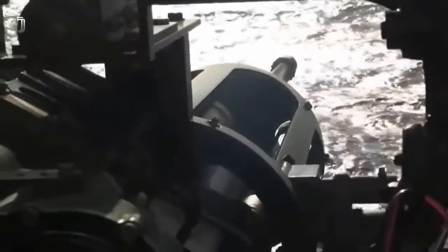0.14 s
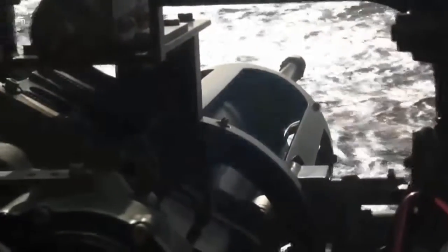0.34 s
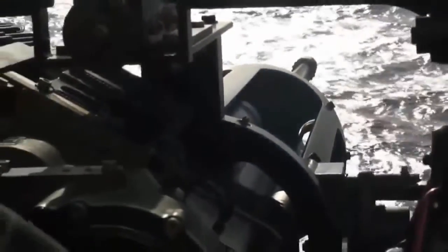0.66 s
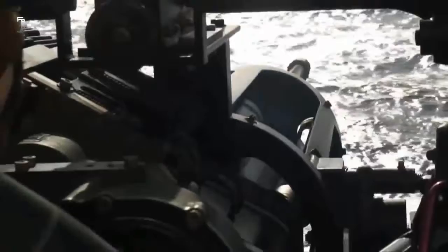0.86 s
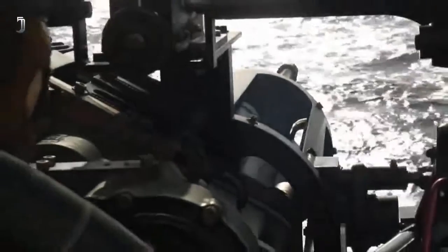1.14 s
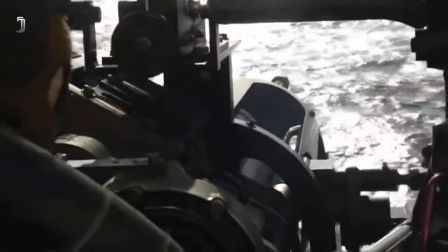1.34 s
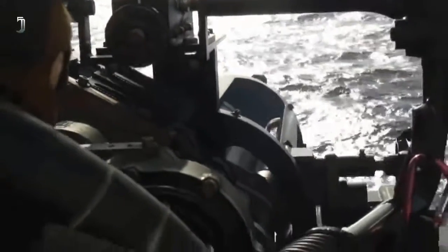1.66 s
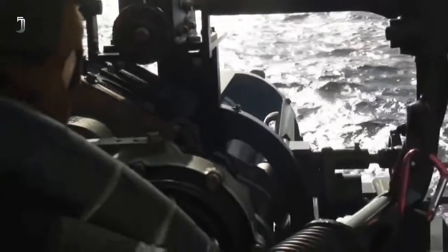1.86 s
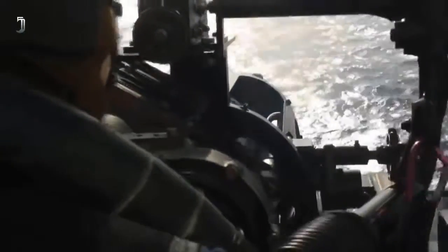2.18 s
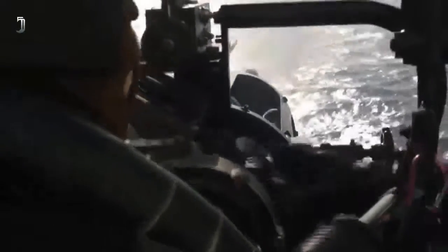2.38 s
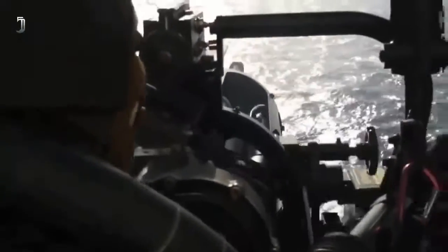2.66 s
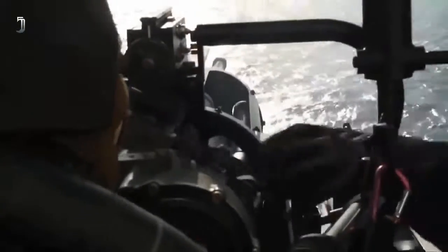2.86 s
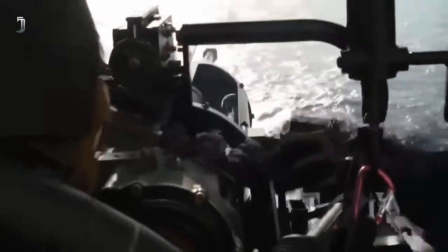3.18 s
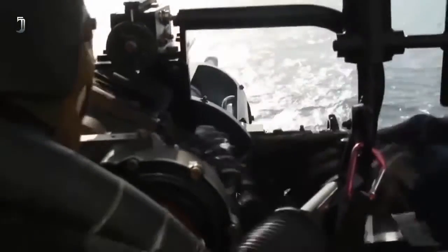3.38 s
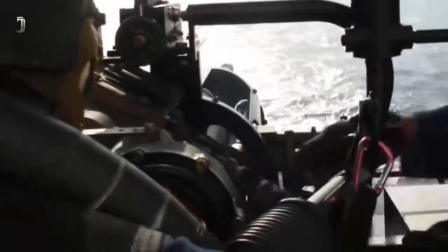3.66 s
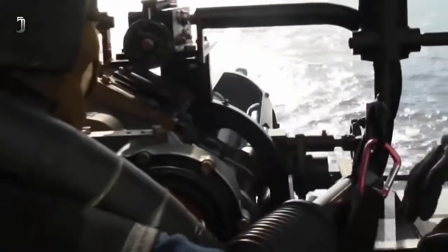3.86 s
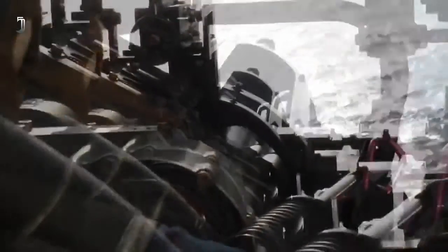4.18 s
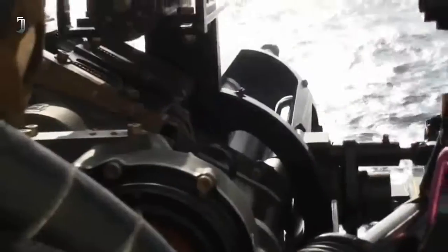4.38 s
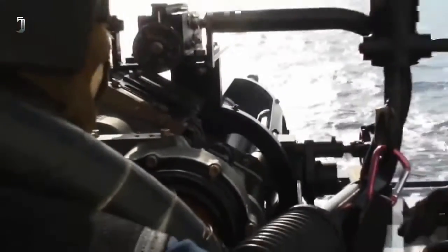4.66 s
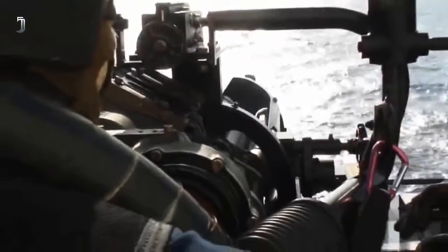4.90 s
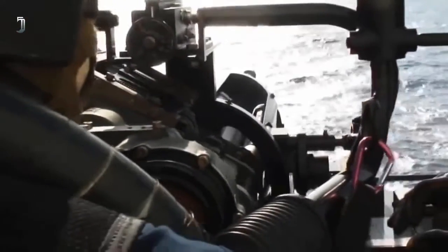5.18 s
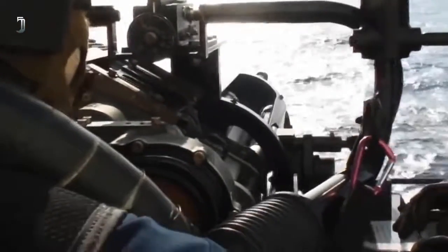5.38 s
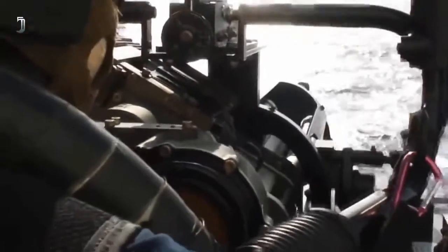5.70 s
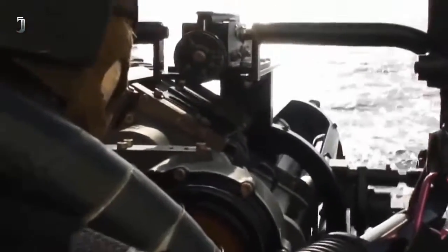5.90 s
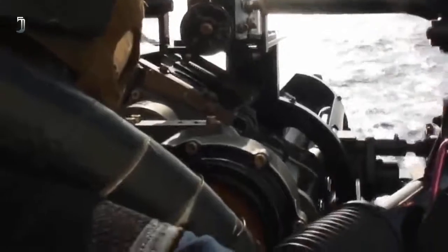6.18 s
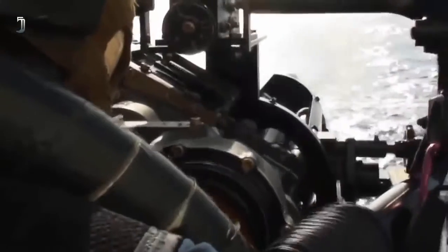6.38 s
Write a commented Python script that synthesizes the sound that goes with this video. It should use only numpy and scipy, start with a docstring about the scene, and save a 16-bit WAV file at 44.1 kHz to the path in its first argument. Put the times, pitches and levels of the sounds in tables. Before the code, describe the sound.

The sound is close, from just behind a mounted automatic cannon on a boat at sea. A quiet machinery hum, hull rumble and water wash run underneath. In the first second, loose steel fittings clink and knock, then jiggle faintly. At 1.8 seconds the feed chain starts grinding, with a hard clank and a high ping of belt links. From 2.0 to 3.3 seconds the cannon fires five loud, even rounds, 0.3 seconds apart. Each is a bright crack, then a roar and boom, with the bolt clanking in time, ringing the shield and slightly overloading the microphone. Until about 4.5 seconds the echo fades over the water while the chain runs down and a faint motor whine sinks. Between 4.4 and 5.4 seconds come light latch clacks and dull knocks. At 6.1 seconds the chain starts again, and firing resumes near 6.35, cut off by the end.

```python
"""A chain-driven cannon on a boat's deck spins up, fires five rounds, and later starts a second burst.
Each round is a bright crack, then a roar and a late boom of expanding gas that ring the gun shield,
scatter back off the sea and overload the microphone. The feed chain grinds, the bolt clanks in time,
and the motor whines down after the first burst. In the pauses loose steel clinks and knocks on the
mount, over a bed of machinery hum, hull rumble and water."""
import sys
import numpy as np
from scipy import signal
from scipy.fft import rfft, irfft, next_fast_len
from scipy.io import wavfile
from scipy.ndimage import uniform_filter1d, map_coordinates

SR = 44100
rng = np.random.default_rng(int(sys.argv[2]) if len(sys.argv) > 2 else 0)


def transcribe(u):
    """Save the signal u as a 16-bit wav file named by the first command-line argument.

    u: samples, shape (n,) or (channels, n), limited to [-1, 1]; the rate is SR.
    q: integer samples, one column per channel.
    """
    v = np.clip(np.atleast_2d(u).T, -1, 1)
    q = np.round(v * 32767).astype(np.int16)
    wavfile.write(sys.argv[1], SR, q)


N = 288414

# bursts of fire: trigger pull t/s, trigger release t/s, feed rattle level/dB
BURSTS = [(1.834, 3.359, -28), (6.145, 6.8, -25.5)]
# modes of the gun's steel receiver: f/Hz, level/dB, t60/s
RECEIVER = [(1410, -6.5, 0.11), (1710, -5, 0.15), (2017, -2.5, .14), (2930, 0.5, 0.087), (3413, -3.5, .12),
            (3720, -2, .14), (4033, -1.5, 0.068), (4820, -4, 0.16), (5420, -5.5, .12), (6040, -2.5, .18),
            (6274, -7.5, .15), (6900, -7.5, .2), (8200, -2.5, 0.1), (8730, -13, .18), (9100, -12, .12),
            (9940, -12, .15), (10800, -12, .08)]


def amp(db):
    """Decibels to gain."""
    return 10 ** (np.asarray(db) / 20)


def unit(x):
    """Scale to rms 1."""
    return x / np.sqrt(np.mean(x ** 2) + 1e-20)


def along(points, hz):
    """Read (f/Hz, value) breakpoints on a log frequency axis."""
    f, value = np.transpose(points)
    return np.interp(np.log(hz + 1), np.log(f), value)


def wobble(rate, size=N):
    """A smooth random curve, rate knots a second."""
    knots = rng.standard_normal(int(size * rate / SR) + 4)
    return map_coordinates(knots, [np.arange(size) * rate / SR])


def filtered(x, response):
    """Equalise x with a gain given as a function of frequency."""
    size = next_fast_len(len(x) + SR // 4)
    return irfft(rfft(x, size) * response(np.fft.rfftfreq(size, 1 / SR)), size)[:len(x)]


def noise(spectrum, size=N):
    """Coloured noise of rms 1 from (f/Hz, level/dB) breakpoints."""
    return unit(filtered(rng.standard_normal(size), lambda hz: amp(along(spectrum, hz))))


def envelope(t, peak_db, attack_s, sag_db_per_s, hold_s, release_db_per_s):
    """Gain that rises, sags until hold_s and then dies away faster."""
    fall_db = sag_db_per_s * np.maximum(t - attack_s, 0) + release_db_per_s * np.maximum(t - hold_s, 0)
    return np.clip(t / attack_s, 0, 1) * amp(peak_db - fall_db)


def add(track, s, sound):
    """Mix a sound into the track from time s."""
    part = track[max(round(s * SR), 0):][:len(sound)]
    part += sound[:len(part)]


def rounds(delay_s=0.21, period_s=0.2975):
    """Ignition times: the gun fires at a steady rate while the trigger is held."""
    return np.concatenate([np.arange(pull + delay_s, release, period_s) for pull, release, _ in BURSTS])


def blows(hits, modes, scrape_db, scrape_t60, scatter_db, split_hz, bite):
    """Steel meets steel: a chattering contact rings the modes at new strengths each time."""
    out, t = np.zeros(N), np.arange(SR // 4) / SR
    hz, mode_db, t60 = np.transpose(modes)[:, :, None]
    for s, db, contact_s, tilt in hits:
        level = mode_db + tilt * np.log2(hz / hz.mean())
        strength = amp(level + scatter_db * rng.standard_normal(hz.shape))
        # each mode is a close pair that beats
        beat = np.cos(2 * np.pi * split_hz * rng.uniform(0.918, 1, hz.shape) * t)
        partials = np.sin(2 * np.pi * (hz * t + rng.random(hz.shape)))
        ring = np.sum(strength * beat * amp(-60 * t / t60) * partials, 0) / np.linalg.norm(strength)
        colour = [(hz.min() / 4, -50), *np.c_[hz, level - level.max()], (hz.max() * 2, -60)]
        scrape = amp(scrape_db - 60 * t / scrape_t60) * noise(colour, len(t))
        body = (1 - np.exp(-t / 0.00039)) * ring + scrape
        # tiny slips and rebounds swell and fade within the contact
        slips = rng.standard_normal(len(t)) * (rng.random(len(t)) < 1400 / SR)
        contact = slips * np.sqrt(t / contact_s) * np.exp(-t / contact_s)
        contact[0] = bite  # the first touch
        hit = signal.fftconvolve(contact, body)[:len(t)]
        peak_rms = np.sqrt(uniform_filter1d(hit ** 2, size=300).max())
        add(out, s, amp(db) * hit / peak_rms)
    # the finite contact time takes off the highest treble
    return filtered(out, lambda f: 0.25 + 0.75 / (1 + (f / 11800) ** 30))


def boat():
    """Machinery hums through the deck, over the rumble of the hull and the wash of the water."""
    # hum partials, rumble spectrum and wash spectrum: f/Hz, level/dB
    hum_partials = [(107.7, -0.5), (220.7, -7.5), (263.8, -13.5), (312.2, -16), (468.3, -19)]
    rumble_spectrum = [(20, -4), (45, -5), (80, 2.5), (110, -6.5), (140, 1), (190, -3), (280, -6.5),
                       (400, -14.5), (900, -57)]
    wash_spectrum = [(150, -14), (350, -3.5), (700, -1), (1150, -4.5), (1550, -17), (2300, -27),
                     (4000, -34), (8000, -37.5), (11000, -46.5), (12500, -64), (15000, -72)]
    # fader rides, one before and one after the first burst: t/s, relative level/dB
    hum_rides = [
        [(0.25, -71), (0.356, -51.5), (0.926, -54.5), (1.8, -48.5)],
        [(4.3, -54), (4.34, -49.5), (5.288, -47.5), (6.12, -42)],
    ]
    wash_rides = [
        [(0.0, -44.5), (0.54, -53.5), (1.178, -56), (1.8, -51)],
        [(4.3, -53), (4.512, -56), (5.15, -55), (6.12, -50.5)],
    ]
    t = np.arange(N) / SR
    hum_db = np.interp(t, *np.vstack(hum_rides).T) + 4.5
    wash_db = np.interp(t, *np.vstack(wash_rides).T) + 0.47
    rumble_db = -48.5 + 5.5 * np.exp(-((t - 4.24) / 0.11) ** 2)  # one brief swell
    drifting_t = np.cumsum(1 + 0.0037 * wobble(5)) / SR
    hum = sum(amp(db + 1.5 * wobble(11)) * np.sin(2 * np.pi * hz * drifting_t) for hz, db in hum_partials)
    rumble = amp(rumble_db + 1.1 * wobble(11)) * noise(rumble_spectrum)
    wash = amp(wash_db + 0.73 * wobble(8)) * noise(wash_spectrum)
    return amp(hum_db) * hum + rumble + wash


def hanging_ring(contact_s=0.0053):
    """A hanging steel ring is jogged lightly, so little but its long tone is heard."""
    jogs = [(.26, -49), (.55, -54), (0.826, -61), (3.88, -62), (3.96, -60.5), (4.92, -51.5), (5.943, -60)]  # light nudges: t/s, level/dB
    modes = [(6278, 1.5, 0.37), (6300, -5.5, 0.15)]  # the ring's tone: f/Hz, level/dB, t60/s
    hits = [(s, db, contact_s, 0) for s, db in jogs]
    return blows(hits, modes, scrape_db=-16, scrape_t60=0.031, scatter_db=2.5, split_hz=8, bite=0.5)


def fittings(gap_s=0.07, contact_s=0.006, tilt_db=-3.5):
    """Loose steel fittings clink on the mount and jiggle in spells of faint, uneven touches."""
    clinks = [(.14, -39, 0.0066, -10.5), (.171, -35, 0.0064, -5.5), (.212, -42, 0.0023, 0),
              (.226, -41.5, 0.0044, -5), (.305, -38, .003, 0.5), (.32, -36, 0.009, -3),
              (.335, -32.5, 0.004, -3), (.521, -57.5, 0.0021, -5.5), (.553, -60, 0.011, -4),
              (.739, -40.5, .0022, -1), (.767, -40.5, .007, 5)]  # distinct hits: t/s, level/dB, contact/s, tilt/(dB per octave)
    spells = [(0.404, 1.0, -68.5), (1.612, 1.8, -60), (5.677, 5.96, -66)]  # jiggling: start t/s, end t/s, level/dB
    modes = [(2031.6, -6, 0.084), (2450, -9.5, 0.071), (2810, -11.5, .07), (3365, -6.5, 0.049),
             (3850, -15, 0.085), (4280, -12, 0.046), (5120, -12, 0.075), (6150, -1, 0.087),
             (6234, -5.5, 0.37), (6620, 0.5, .12), (7260, -2, .12), (7800, -12, .09), (8380, 3.5, 0.138),
             (8860, -11.5, .09), (9400, -5.5, 0.091), (11100, -2.5, 0.072), (10960, -8, 0.067),
             (11330, -9.5, .14), (12360, -17.5, .08)]  # the fittings' ring: f/Hz, level/dB, t60/s
    hits = list(clinks)
    for start, end, db in spells:
        for s in np.arange(start, end, gap_s):
            hits.append((s + rng.uniform(0, gap_s / 2), db + rng.uniform(-0.5, 0.5), contact_s, tilt_db))
    return blows(hits, modes, scrape_db=-7, scrape_t60=0.099, scatter_db=7, split_hz=12, bite=0.55)


def cradle():
    """Dull knocks ring the low modes of the gun cradle."""
    knocks = [(.038, -44, .005, 5), (.108, -30.5, 0.0037, -2.5), (.12, -34.5, .008, -2),
              (.14, -35, 0.0132, -3.5), (.333, -40.5, .007, 2), (4.497, -46, .003, 3.5),
              (4.514, -39, .0043, 1.5), (5.367, -44, 0.0025, -2.5)]  # hits on the cradle: t/s, level/dB, contact/s, tilt/(dB per octave)
    modes = [(192.4, -7.5, 0.25), (339, -9.5, 0.3), (541, -7.5, 0.4), (705, -3.5, 0.11), (932, -5.5, 0.05),
             (1090, -4, 0.063), (1248, -3, 0.11), (1677, -7.5, 0.078), (2076, -11, 0.075),
             (2516, -16.5, 0.06), (2880, -28, 0.06), (3700, -26, 0.092)]  # its ring: f/Hz, level/dB, t60/s
    return blows(knocks, modes, scrape_db=-5.5, scrape_t60=0.13, scatter_db=2, split_hz=2.5, bite=0.9)


def latch():
    """A latch on the gun is worked between the bursts, in short, bright clacks."""
    clacks = [(4.448, -49.5, 0.0134, -7.5), (4.495, -48.5, 0.015, -7.5), (4.76, -43, 0.0041, -3.5),
              (4.769, -35, 0.0027, -3), (4.902, -35.5, 0.0024, -1.5), (4.974, -36.5, 0.0061, 6),
              (5.081, -49, 0.0046, 6.5), (5.249, -57.5, .002, 2), (5.365, -58, .003, 0),
              (5.385, -48.5, 0.0067, 2), (5.743, -57.5, .004, -11)]  # latch hits: t/s, level/dB, contact/s, tilt/(dB per octave)
    modes = [(804, -3.5, 0.039), (1008, -6.5, 0.16), (1410, -5, 0.052), (1690, -11, .05),
             (2320, -7.5, 0.025), (2621, -3.5, 0.037), (3320, -2.5, 0.039), (3830, -7, 0.033),
             (3920, -4, 0.037), (4320, -3.5, 0.032), (5160, -6, .06), (6040, 1.5, 0.032), (6300, 0, 0.046),
             (6720, -1, 0.069), (7190, 3, .06), (7670, -5, 0.055), (8560, 3, 0.054), (8330, -1.5, 0.15),
             (8580, -2, 0.11), (9630, -10.5, 0.092), (10700, -3, 0.061), (11050, -1, 0.042)]  # its ring: f/Hz, level/dB, t60/s
    return blows(clacks, modes, scrape_db=-14, scrape_t60=0.11, scatter_db=3, split_hz=5.5, bite=0.207)


def belt_links():
    """Loose belt links are set ringing in high, clean pings."""
    pings = [(1.965, -33.5, .005, -7.5), (1.98, -23, .005, -0.5), (2.555, -33, .007, -6),
             (6.283, -28, .008, 11)]  # link hits: t/s, level/dB, contact/s, tilt/(dB per octave)
    modes = [(4843, 1.5, 0.23), (6160, -8, .15), (6400, -5, .25), (7050, -5, .14), (8500, -10, .14)]  # a link's ring: f/Hz, level/dB, t60/s
    return blows(pings, modes, scrape_db=-16.5, scrape_t60=0.03, scatter_db=0.5, split_hz=8.1, bite=0.4)


def coasting_motor(start_hz=2720, sink_hz_per_s=1180, blur_hz=257):
    """A rough gear whine sinks as the motor runs out after the first burst."""
    t = np.arange(N) / SR - BURSTS[0][1]  # time since the trigger's release
    phase = 2 * np.pi * np.cumsum(np.maximum(start_hz - sink_hz_per_s * t, 0)) / SR
    whine = unit(wobble(blur_hz) * np.sin(phase) + wobble(blur_hz) * np.cos(phase))
    return whine * envelope(t, -58.5, attack_s=0.92, sag_db_per_s=6.5, hold_s=0.92, release_db_per_s=45)


def feed_chain(spin_up_s=0.026, run_down_s=0.74, jolts_per_s=69, jolt_decay_s=0.0047, dull_hz=3801):
    """Chain links and cartridges grind through the feeder and jolt against it while the drive runs."""
    spectrum = [(120, -41.5), (200, -10.5), (479, -5.5), (1430, 3), (2470, -5), (2960, -4.5), (3240, -7),
                (6130, -8), (7480, -10.5), (10800, -19.5), (12200, -33.5), (14400, -26), (15500, -33.5)]  # the chain's grind: f/Hz, level/dB
    kicks = (rng.random(N) < jolts_per_s / SR) * rng.uniform(0.51, 1, N)
    jolts = signal.lfilter([1], [1, -np.exp(-1 / (jolt_decay_s * SR))], kicks)
    grind = (1 + amp(5) * jolts) * amp(0.5 * wobble(400)) * noise(spectrum)
    steel = lambda f: 1 + sum(0.58 * amp(db) / (1 + 1j * (f - hz) / 35) for hz, db, _ in RECEIVER)
    bright = unit(filtered(grind, steel))
    # the drive needs a moment to reach speed, and slow contacts sound dull
    dull = unit(filtered(bright, lambda f: 1 / (1 + (f / dull_hz) ** 2)))
    out, t = np.zeros(N), np.arange(N) / SR
    for pull, release, db in BURSTS:
        spin_up = 1 - np.exp(-np.maximum(t - pull, 0) / spin_up_s)
        run_down = np.clip(1 - (t - release) / run_down_s, 0, 1)
        blend = spin_up ** 5 * run_down ** 1.2
        out += amp(db) * spin_up * run_down ** 2.64 * ((1 - blend) * dull + blend * bright)
    return out


def bolt_and_belt():
    """The bolt's cycle rings the receiver on every round; so does the belt as it snatches or slackens."""
    # take up, draw, feed, ram, lock, fire: t/s from ignition, level/dB, contact/s, tilt/(dB per octave)
    cycle = [(-.198, -32, .005, -4), (-.177, -36, .007, 0.5), (-.13, -24, .012, 1), (-.096, -21, .008, 4),
             (-.029, -28, 0.014, -8.5), (.008, -19, .004, 2)]
    clanks = [(1.944, -15.5, 0.00334, 1.5), (3.55, -40, 0.005, 12), (3.648, -33, .0074, -3.5),
              (3.825, -42.5, .007, -5.5), (3.938, -55.5, 0.0074, -3), (4.136, -60, .004, -9),
              (4.231, -65, 0.0086, -8), (6.263, -19, 0.0077, -1)]  # the belt's hits: t/s, level/dB, contact/s, tilt/(dB per octave)
    hits = [(s + offset, *blow) for s in rounds() for offset, *blow in cycle] + clanks
    return blows(hits, RECEIVER, scrape_db=-2, scrape_t60=0.071, scatter_db=4.5, split_hz=17, bite=1.3)


def sea_echo(level_db=-24, build_s=0.088):
    """Each report scatters back from the waves; the treble dies first."""
    spectrum = [(25, -14), (150, -1.5), (400, -4), (1000, -1), (2000, -9.5), (3800, -6), (6000, -20.5),
                (10000, -22.5), (13000, -46.5)]  # the tail's colour: f/Hz, level/dB
    decay = [(100, 3.2), (500, 2.027), (1500, 2.2), (3000, 1.2), (6000, 0.41), (12000, .7)]  # the tail's length: f/Hz, t60/s
    out = np.zeros(N)
    for s in rounds():
        hz, t, bands = signal.stft(noise(spectrum, 2 * SR), SR, nperseg=512)
        fade = amp(-60 * t / along(decay, hz)[:, None]) * (1 - np.exp(-t / build_s))
        add(out, s, amp(level_db) * signal.istft(bands * fade, SR, nperseg=512)[1])
    return out


def shield(blast):
    """The blast arrives directly and through the ringing plates around the gun."""
    modes = [(105.6, 11, -5), (191.4, 11, -7.5), (229.8, 10, -7.5), (317.6, 9, -4.5), (343, 12, -6.5),
             (395, 20, -5.5), (450, 7.3, -3), (540.4, 3.7, -1), (614, 20, -0.5), (697, 30, -7.5),
             (760, 10, -6), (1280, 40, -10)]  # shield and deck resonances: f/Hz, width/Hz, level/dB
    plates = lambda f: sum(amp(db) / (1 + 2j * (f - hz) / width) for hz, width, db in modes)
    return filtered(blast, lambda f: 1 + plates(f))


def cannon_blasts():
    """The crack comes first; the roar and boom of the expanding gas swell behind it, torn by shocks."""
    # the top, middle and low layers of the report: f/Hz, level/dB
    crack_spectrum = [(200, -30), (700, -2.5), (1500, 1), (2500, 0), (3600, 0.5), (7000, -1), (9000, -3.5),
                      (11200, -6.5), (12200, -16), (15500, -19)]
    roar_spectrum = [(100, -18), (350, -5), (480, -4), (720, -2), (1100, -1.5), (1600, -6), (2400, -11.5),
                     (5000, -27.5), (12000, -54)]
    boom_spectrum = [(20, -19.5), (45, -11.5), (80, -3), (120, 0), (200, 2.5), (350, 0), (480, -10),
                     (900, -24.5), (3000, -61.5)]
    out, size = np.zeros(N), SR // 2
    t = np.arange(size) / SR
    crack_gain = envelope(t, -13, attack_s=0.0256, sag_db_per_s=88, hold_s=0.23, release_db_per_s=61)
    roar_gain = envelope(t, -17.5, attack_s=0.028, sag_db_per_s=15, hold_s=0.19, release_db_per_s=139)
    boom_gain = envelope(t, -21, attack_s=0.1185, sag_db_per_s=4, hold_s=0.2, release_db_per_s=134.5)
    for s in rounds():
        shocks = wobble(420, size)
        crack = crack_gain * unit(amp(2 * shocks) * noise(crack_spectrum, size))
        roar = roar_gain * unit(amp(1.6 * shocks) * noise(roar_spectrum, size))
        boom = boom_gain * noise(boom_spectrum, size)
        add(out, s, crack + roar + boom)
    return out


def scene():
    """Gun, mount and boat, heard in mono from just behind the breech."""
    gunfire = shield(cannon_blasts() + sea_echo())
    mechanism = feed_chain() + coasting_motor() + bolt_and_belt()
    small_steel = fittings() + latch() + belt_links() + hanging_ring() + cradle()
    return (gunfire + mechanism + small_steel + boat())[None]


def record(dry, ceiling=0.57, hardness=5, low_cut_hz=30, top_hz=15850):
    """The microphone rounds off the loudest peaks; the deepest bass and the very top are cut."""
    squashed = dry[0] / (1 + np.abs(dry[0] / ceiling) ** hardness) ** (1 / hardness)
    passband = lambda hz: hz / np.hypot(hz, low_cut_hz) / (1 + (hz / top_hz) ** 200)
    return filtered(squashed, passband)[None]


dry = scene()
out = record(dry)
transcribe(out)
```